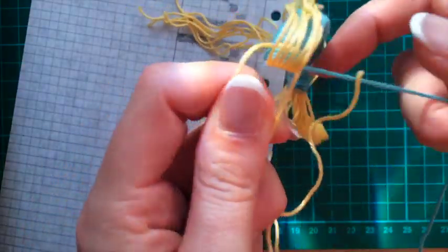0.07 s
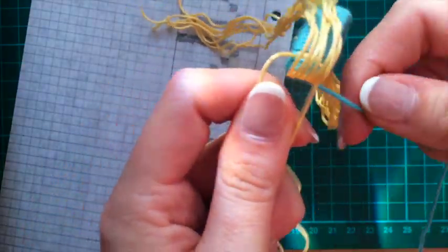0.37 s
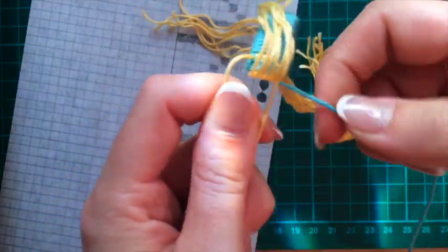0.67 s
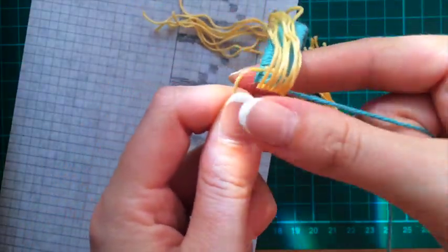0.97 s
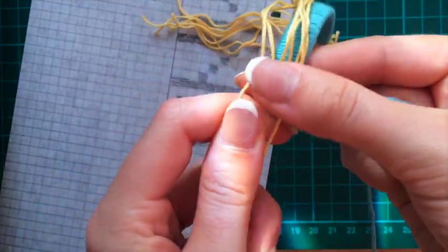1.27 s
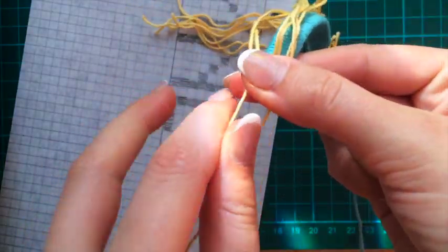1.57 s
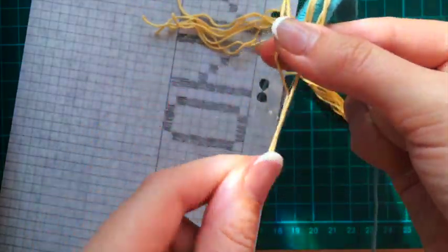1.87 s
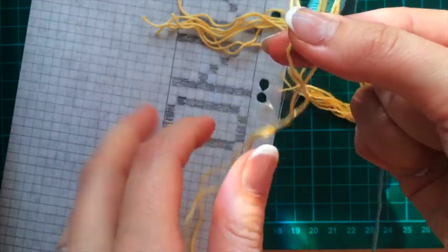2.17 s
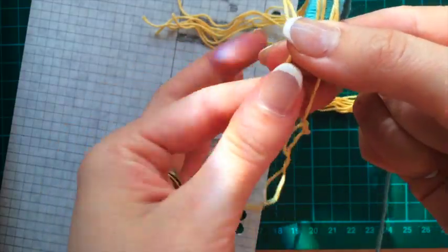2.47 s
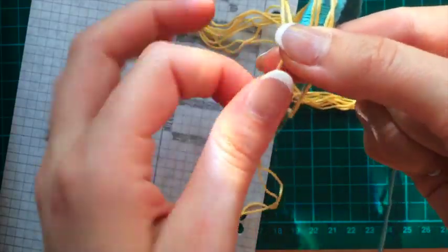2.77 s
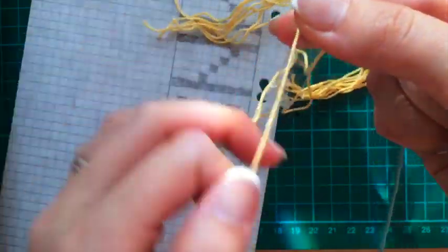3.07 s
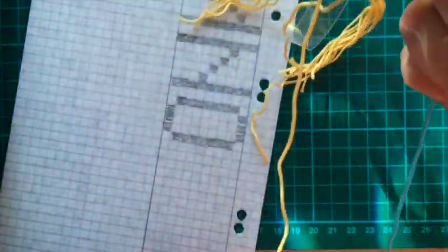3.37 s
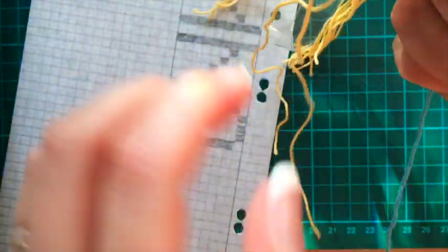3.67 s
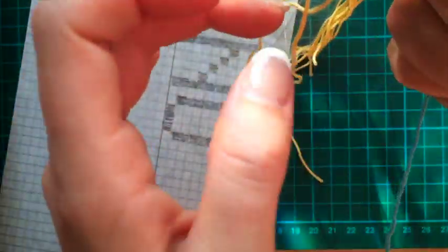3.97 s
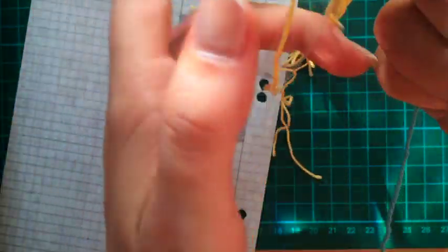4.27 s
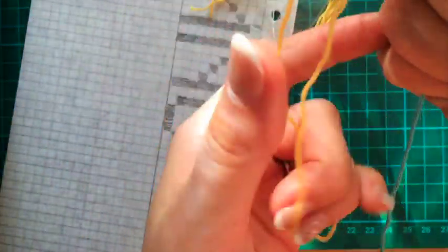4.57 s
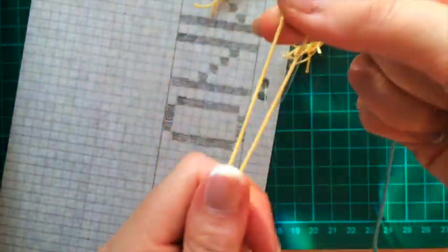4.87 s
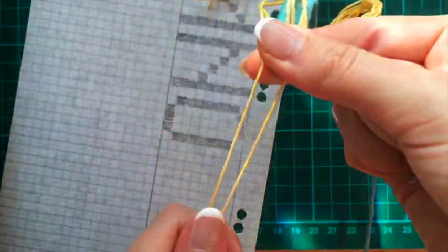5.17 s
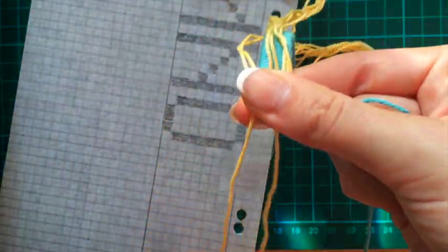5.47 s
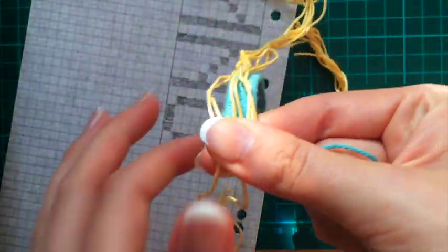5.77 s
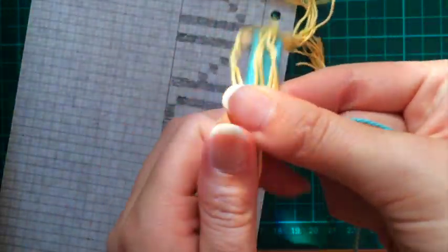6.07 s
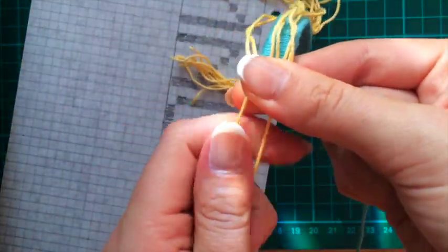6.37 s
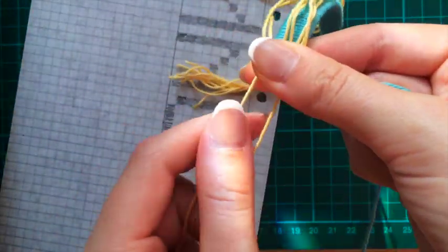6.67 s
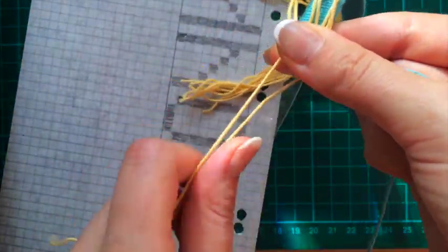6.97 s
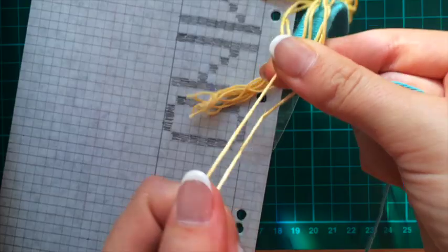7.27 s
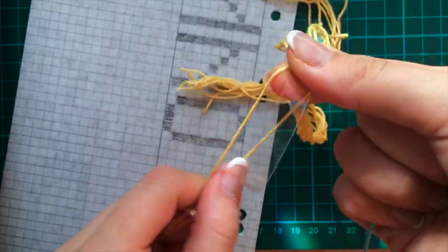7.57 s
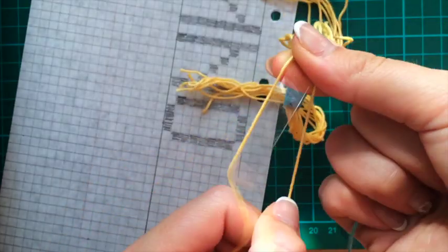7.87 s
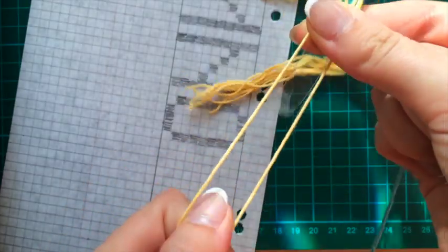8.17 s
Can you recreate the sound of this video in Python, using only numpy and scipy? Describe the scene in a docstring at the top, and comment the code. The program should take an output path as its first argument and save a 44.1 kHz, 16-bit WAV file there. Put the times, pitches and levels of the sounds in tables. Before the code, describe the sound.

In a small, quiet room with a constant whirr and low hum, thread is worked around a springy plastic strip, heard close up. A light click opens, followed by soft thread swishes and muffled brushes against the table. A sharp click and a louder double snap come around the middle. Then the ticks, slides and short scrapes grow busier, ending in another bright snap and a few faint ticks.

```python
"""A sharp plastic click over a soft hiss of thread: hands wrap embroidery thread around a thin strip,
close to a small camera on a craft table. The springy strip snaps against nails and rings the table.
Thread slides through fingers and rasps over the plastic edge, fibres tick, and hands brush the table.
Behind them sit room noise, a steady whirr and faint mains hum. The gain dips after the loudest snaps."""
import sys
import numpy as np
from scipy import signal
from scipy.fft import rfft, irfft, next_fast_len
from scipy.io import wavfile

SR = 44100
rng = np.random.default_rng(int(sys.argv[2]) if len(sys.argv) > 2 else 0)


def wav_out(sig):
    """Save sig, one row per channel (or a flat mono array), as 16-bit PCM at SR to the path in sys.argv[1]."""
    wavfile.write(sys.argv[1], SR, np.round(np.clip(np.atleast_2d(sig).T, -1, 1) * 32767).astype(np.int16))


N = 371322
TIME = np.arange(N) / SR

# The colour of the room tone and hiss. Each row: frequency in Hz, relative spectral level in dB.
ROOM_SPECTRUM = [(20, -16), (35, -7), (52, 1.5), (80, -3), (150, -5.5), (235, -11), (310, -10), (400, -14),
                 (720, -14.5), (1350, -13), (2500, -21), (5000, -25), (10000, -28), (15000, -26.5)]
# The resonances of the whirr. Each row: centre in Hz, nominal width in Hz, relative level in dB.
WHIRR_PEAKS = [(882.5, 108, -0.5), (999, 159, -3), (1591, 60, -5), (1762, 150, 1.5), (1875, 118, -3.5),
               (2270, 43, -13.5)]
# Hands brush and bump the table and pattern sheet. Each row: start in seconds, length in seconds,
# level in dB, pitch in Hz.
HAND_BRUSHES = [(0.154, 0.57, -49.5, 81), (0.097, 0.9, -58, 300), (1.45, 0.47, -55.5, 302),
                (1.667, 0.033, -44.5, 327), (1.7, 0.17, -46, 91), (2.7, 0.59, -54, 298),
                (2.98, .14, -52, 166), (3.546, 0.061, -40, 78), (4.201, .4, -52.5, 79.3),
                (4.559, 0.2, -42, 62.4), (5.401, 0.77, -58, 300), (6.8, 0.53, -50.5, 262),
                (7.351, 0.74, -54.5, 305)]
# Loose thread is pulled through the fingers. Each row: start in seconds, length in seconds,
# level in dB, brightness in Hz.
THREAD_PULLS = [(0, 0.3, -56.5, 9500), (0.355, 0.28, -52, 9500), (0.69, 0.07, -52, 11000),
                (1.067, 0.074, -59, 10000), (1.246, .24, -50.5, 6800), (1.482, .07, -56, 9000),
                (2.171, 0.19, -56.5, 6540), (2.483, 0.45, -58.5, 11500), (3.002, 0.38, -52, 12600),
                (4.273, 0.18, -51.5, 14500), (4.62, 0.17, -59, 9000), (5.174, 0.28, -52.5, 10400),
                (5.689, 0.1, -53.5, 7000), (6.147, 0.29, -53, 13000), (6.415, .15, -46, 7500),
                (6.64, 0.16, -48.5, 8500), (6.813, 0.063, -46.5, 11500), (6.94, 0.11, -55, 13000),
                (7.124, 0.19, -52, 7140), (7.457, 0.2, -56.5, 7000), (7.765, .04, -44, 13500),
                (7.937, 0.085, -56, 13500), (8.096, 0.13, -54, 7750), (8.29, 0.095, -57, 10000)]
# Taut thread scrapes the strip's edge. Each row: start in seconds, length in seconds, level in dB,
# brightness in Hz, level of the table's hollow note in dB, its pitch in Hz.
EDGE_SCRAPES = [(1.669, 0.026, -32, 9800, -44, 840), (2.953, 0.013, -24, 10900, -28, 894),
                (3.55, 0.013, -21.5, 4130, -31.5, 1440), (3.561, .026, -25.5, 4500, -43, 800),
                (3.589, 0.011, -27, 6950, -34.5, 297), (4.366, 0.077, -46.5, 13500, -48.5, 850),
                (4.398, 0.014, -36.5, 13400, -45.5, 540), (6.567, 0.18, -45, 4100, -51, 910),
                (6.872, 0.061, -42.5, 5900, -44, 950), (6.924, .013, -29.5, 7540, -35.5, 670),
                (6.933, 0.011, -27, 13300, -37, 1070), (7.826, 0.049, -40.5, 13350, -52, 920),
                (7.922, 0.014, -29.5, 13500, -45, 905)]
# Single fibres flick off a fingertip. Each row: start in seconds, level in dB, pitch in Hz.
FIBRE_TICKS = [(.212, -40.5, 12500), (.248, -44, 13000), (0.705, -39, 12000), (1.318, -39.5, 7500),
               (1.654, -36, 11000), (1.747, -38, 11500), (2.095, -44, 11000), (2.183, -46, 7000),
               (2.227, -42, 5130), (2.491, -41, 13500), (3.062, -43.5, 13000), (3.372, -46, 8450),
               (4.206, -45, 14000), (4.2145, -37, 13600), (5.41, -40.5, 13500), (6.2363, -37, 13000),
               (6.268, -43, 12000), (6.9625, -39, 11500), (7.633, -37, 10800), (7.788, -32.5, 12500),
               (7.8, -36, 11000), (7.8756, -37, 12000), (7.889, -34, 13000), (7.982, -37, 13000),
               (8.0016, -40, 13800), (8.0167, -39, 13400), (8.126, -35, 12330)]
# What a snap rings in the table and camera. Each row: frequency in Hz, level relative to the knock
# in dB, time to fade by 60 dB in seconds.
TABLE_RESONANCES = [(75.5, -38, 0.22), (189.4, -5, 0.12), (237, -10, 0.16), (294, -9, 0.17),
                    (882, 8.5, 0.035), (976, -1, 0.071), (1040, -15, 0.045), (1722, 7, 0.043),
                    (2030, -7, 0.075), (2570, -7, 0.08), (3360, -3, 0.027), (3500, -48, 0.03)]
# The strip snaps against a nail. Each row: start in seconds, level in dB, contact time in milliseconds,
# brightness in Hz, ring of the strip in Hz, knock passed to the table in dB.
STRIP_SNAPS = [ (0.1209, -23.5, 0.33, 2670, 2430, -40.5), (1.7161, -33, 0.68, 9000, 2970, -45),
               (1.7367, -28, 1.64, 11300, 11300, -44), (2.957, -21.5, 0.88, 8000, 4800, -41),
               (2.9591, -20.5, 2.2, 9000, 10800, -39), (3.5547, -8, 0.72, 6700, 8200, -21),
               (3.5855, -16, 1.16, 4700, 2700, -34), (4.401, -44, 3.1, 3500, 2980, -43),
               (5.697, -37.5, 1.14, 7000, 5230, -51), (6.1665, -22, 0.36, 1530, 2050, -38),
               (6.8062, -29.5, 0.31, 6960, 2800, -49), (6.9281, -26.5, 1.4, 4020, 3300, -34.5),
               (7.483, -36.5, 0.83, 10930, 13200, -47.5), (7.846, -23.5, 1.1, 11400, 12900, -47),
               (7.9324, -10.5, 0.83, 11800, 12800, -50)]

# A tighter thread is brighter and rings higher: its pitch at middling brightness, how steeply it follows.
THREAD_HZ, MID_BRIGHTNESS_HZ, TENSION_EXPONENT = 2940, 8120, 0.38


def undb(db):
    """Decibels to gain."""
    return 10 ** (np.asarray(db) / 20)


def level(x, db):
    """Scale to an rms level."""
    return x * undb(db) / np.sqrt(np.mean(x ** 2))


def add(track, start_s, sound):
    """Drop a sound onto the track at its cue."""
    start = max(int(start_s * SR), 0)
    part = sound[:max(N - start, 0)]
    track[start:start + len(part)] += part


def band(f, hz, width):
    """Response of a two-pole band-pass, gain 1 at the centre."""
    return 1j * f * width / (hz ** 2 - f ** 2 + 1j * f * width)


def resonate(x, hz, width):
    """Pass a sound through one resonance."""
    size = next_fast_len(len(x) + 2048)
    return irfft(rfft(x, size) * band(np.fft.rfftfreq(size, 1 / SR), hz, width), size)[:len(x)]


def soften(x, hz, breadth, skirt=4):
    """A contact favours the range around hz; breadth and skirt are filter widths as multiples of it."""
    return resonate(resonate(x, hz, hz * breadth), hz, hz * skirt)


def background(room_db=-49.5, whirr_db=-48, hum_hz=118.6, hum_db=-53.5):
    """The bed: room tone with microphone hiss, a whirr in two clusters of resonances, and mains hum."""
    size = next_fast_len(N)
    f = np.fft.rfftfreq(size, 1 / SR)
    curve_hz, curve_db = np.transpose(ROOM_SPECTRUM)
    colour = undb(np.interp(np.log(f + 1), np.log(curve_hz), curve_db))
    peaks = [undb(db) * np.abs(band(f, hz, width)) ** 2 for hz, width, db in WHIRR_PEAKS]
    whirr_colour = np.linalg.norm(peaks, axis=0)
    room = irfft(rfft(rng.standard_normal(size)) * colour, size)[:N]
    whirr = irfft(rfft(rng.standard_normal(size)) * whirr_colour, size)[:N]
    hum = np.sin(2 * np.pi * hum_hz * TIME)
    return level(room, room_db) + level(whirr, whirr_db) + level(hum, hum_db)


def reflections(x, wet_db=-16, t60=0.12, damp_hz=7000, predelay_s=0.003):
    """A small furnished room answers with a short, duller tail."""
    t = TIME[:SR // 3]
    tail = rng.standard_normal(len(t)) * np.exp(-np.log(1000) * t / t60) * (t > predelay_s)
    tail = signal.lfilter(*signal.butter(1, damp_hz, fs=SR), tail)
    return undb(wet_db) * signal.fftconvolve(x, tail / np.linalg.norm(tail))[:N]


def swell(length, taper):
    """A movement that speeds up and slows down again."""
    return np.sin(np.linspace(0, np.pi, int(length * SR))).clip(0) ** taper


def rub(length, db, hz, breadth):
    """Rubbing stirs one broad, dull resonance."""
    pressure = swell(length, taper=0.79)
    noise = rng.standard_normal(SR)[:len(pressure)]
    return pressure * level(soften(noise, hz, breadth, skirt=breadth), db)


def hand_brushes():
    """Soft skin draws only dull bumps and a low rumble from the table."""
    out = np.zeros(N)
    for start, length, db, hz in HAND_BRUSHES:
        add(out, start, rub(length, db, hz, breadth=0.41))
    return out


def taut_thread(x, hz, glide_per_s, reflection, passes=4):
    """Tension waves bounce along the free thread; its pitch drifts as the length changes."""
    i = np.arange(len(x))
    period = SR / (hz * np.exp(glide_per_s * (i - len(x) / 2) / SR))
    return sum(reflection ** k * np.interp(i - k * period, i, x, left=0) for k in range(passes))


def friction(length, db, hz, grain_db, catch_db, breadth, echo_db, catch_hz=130, glide_per_s=4.8):
    """Fibres stick and slip in dense tiny grains; the twist of the thread catches unevenly."""
    speed = swell(length, taper=0.57)
    slip, grain_size, twist = rng.standard_normal((3, SR // 2))[:, :len(speed)]
    catches = np.interp(TIME[:len(slip)] * catch_hz, np.arange(len(slip)), twist)
    grains = slip * undb(grain_db * grain_size + catch_db * catches)
    thread_hz = THREAD_HZ * (hz / MID_BRIGHTNESS_HZ) ** TENSION_EXPONENT
    rasp = taut_thread(grains, thread_hz, glide_per_s * rng.standard_normal(), undb(echo_db))
    return speed[:len(slip)] * level(soften(rasp, hz, breadth), db)


def thread_slides():
    """Loose thread hisses softly through the fingers."""
    out = np.zeros(N)
    for start, length, db, hz in THREAD_PULLS:
        add(out, start, friction(length, db, hz, grain_db=3.5, catch_db=3.5, breadth=1.9, echo_db=-11.5))
    return out


def edge_scrapes():
    """Taut thread rasps over the plastic edge, and the table answers with a dull, hollow note."""
    out = np.zeros(N)
    for start, length, db, hz, hollow_db, hollow_hz in EDGE_SCRAPES:
        rasp = friction(length, db, hz, grain_db=9.5, catch_db=1.0, breadth=1.87, echo_db=-10)
        hollow = rub(length, hollow_db, hollow_hz, breadth=0.39)
        add(out, start, rasp + hollow)
    return out


def contact(contact_ms, flutter_db=-22, flutter_s=0.0099):
    """The force of a release: a quick push, then a fading flutter."""
    t = TIME[:SR // 16]
    age = t * 1000 / contact_ms
    return age * np.exp(1 - age) + undb(flutter_db) * np.exp(-t / flutter_s)


def crack(force, db, hz, ring_hz, breadth, ring_db, ring_breadth):
    """A release cracks for a few milliseconds around its brightness and rings briefly."""
    push = rng.standard_normal(len(force)) * force
    body = level(soften(push, hz, breadth), 0)
    # the free length changes with every grip, and the pitch with it
    ring = level(resonate(push, ring_hz, ring_hz * ring_breadth), ring_db)
    # the strip's constant width gives every click the same faint edge
    edge = level(resonate(push, hz=3400, width=350), db=-16)
    # a tap cushioned by the fingertip loses its treble
    cushion = signal.butter(3, min(2.6 * hz, SR / 2 - 1000), fs=SR, output="sos")
    sound = signal.sosfilt(cushion, body + ring + edge)
    return level(sound, db) * np.sqrt(np.mean(force ** 2))


def fibre_ticks(strays_per_s=4.4, stray_spread_db=7):
    """Fibres flick free, too light to ring the table; faint strays scatter along the longer pulls."""
    out, force = np.zeros(N), contact(contact_ms=1.15)
    strays = [(start + length * rng.random(), db + stray_spread_db * rng.standard_normal(), hz)
              for start, length, db, hz in THREAD_PULLS
              for _ in range(round(strays_per_s * length))]
    for start, db, hz in FIBRE_TICKS + strays:
        add(out, start, crack(force, db, hz, ring_hz=hz, breadth=3.8, ring_db=0, ring_breadth=0.099))
    return out


def strip_snaps(detune_spread=0.035):
    """Each snap against a nail cracks, leaves the strip fluttering and rings the table."""
    out, t = np.zeros(N), TIME[:SR // 6]
    for start, db, contact_ms, hz, ring_hz, knock_db in STRIP_SNAPS:
        force = contact(contact_ms)
        add(out, start, crack(force, db, hz, ring_hz, breadth=2.8, ring_db=-3, ring_breadth=0.13))
        attack = 1 - np.exp(-t * 1000 / contact_ms)
        for mode_hz, mode_db, t60 in TABLE_RESONANCES:
            # every contact point favours the modes a little differently
            detune, accent_db = rng.standard_normal(2)
            tone = np.cos(2 * np.pi * mode_hz * (1 + detune_spread * detune) * t)
            decay = np.exp(-np.log(1000) * t / t60)
            add(out, start, undb(knock_db + mode_db + accent_db) * tone * attack * decay)
    return out


def scene():
    """The close handwork and its reflections over the background bed, in mono."""
    bed = background()
    hands = strip_snaps() + edge_scrapes() + thread_slides() + hand_brushes() + fibre_ticks()
    return (hands + reflections(hands) + bed)[None]


def gain_control(x, threshold_db=-24, share=0.63, recovery_db_per_s=5.0, detector_hz=8):
    """Loud snaps duck the gain; it creeps back at a steady rate."""
    power = signal.lfilter(*signal.butter(1, detector_hz, fs=SR), x ** 2)
    duck_db = share * np.maximum(10 * np.log10(power + 1e-12) - threshold_db, 0)
    recovery_db = recovery_db_per_s * TIME
    return x * undb(recovery_db - np.maximum.accumulate(duck_db + recovery_db, axis=-1))


def record(dry):
    """The camera rides its gain, rounds the highest peaks and cuts the top."""
    ceiling, top_hz = 0.95, 15300
    rounded = ceiling * np.tanh(gain_control(dry) / ceiling)
    lowpass = signal.ellip(10, 0.2, 70, top_hz, fs=SR, output="sos")
    return signal.sosfilt(lowpass, rounded)


dry = scene()
out = record(dry)
wav_out(out)
```